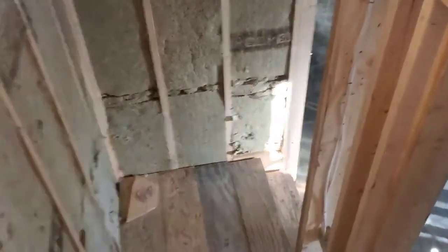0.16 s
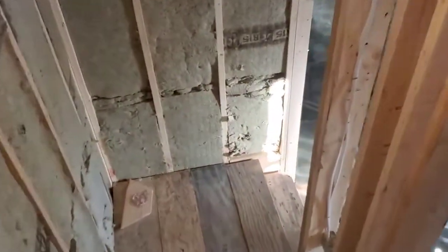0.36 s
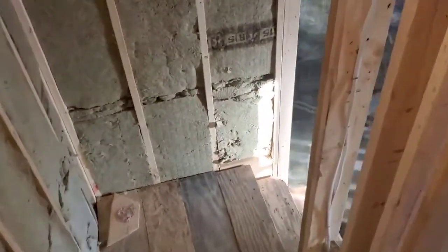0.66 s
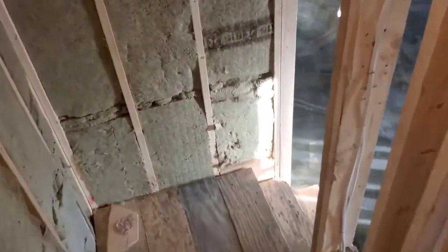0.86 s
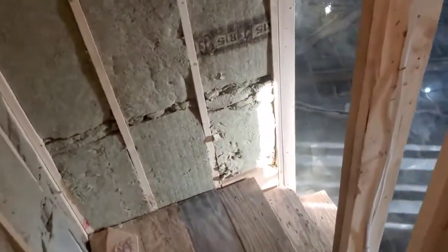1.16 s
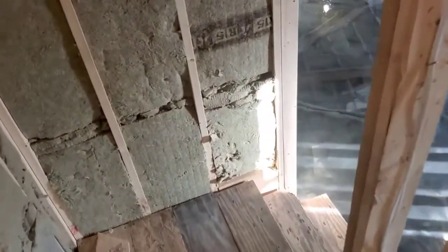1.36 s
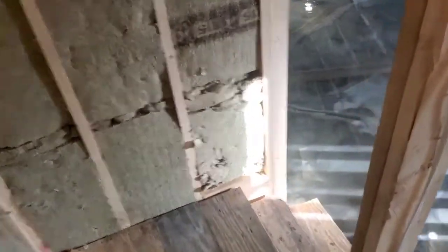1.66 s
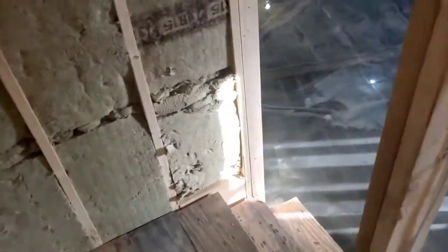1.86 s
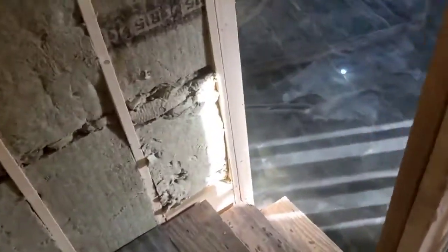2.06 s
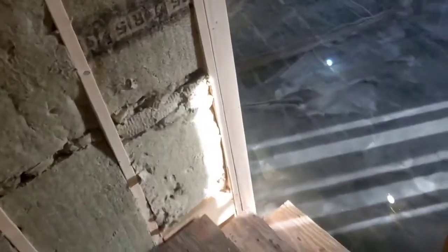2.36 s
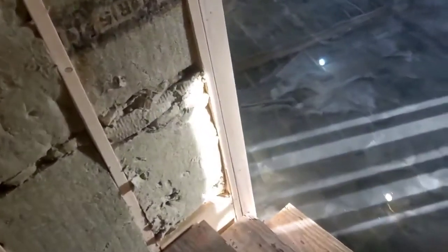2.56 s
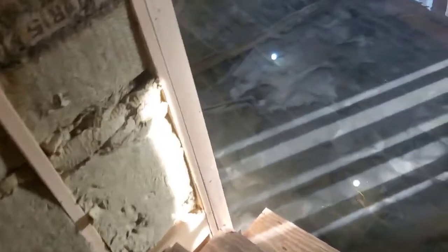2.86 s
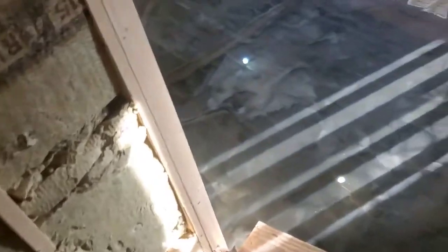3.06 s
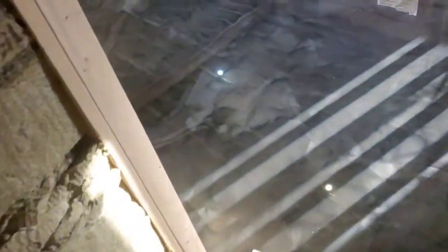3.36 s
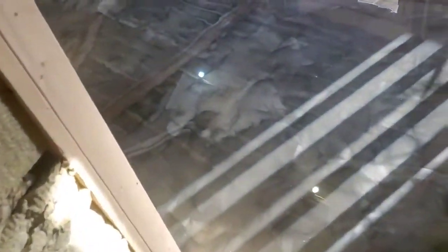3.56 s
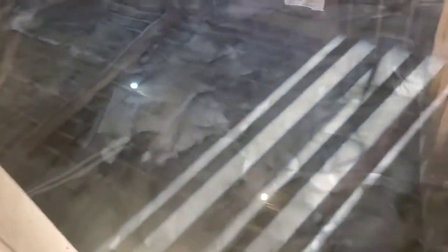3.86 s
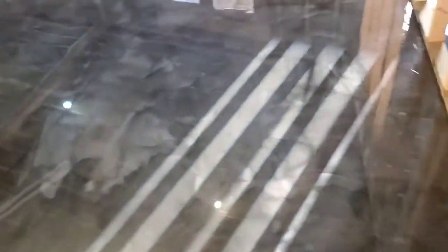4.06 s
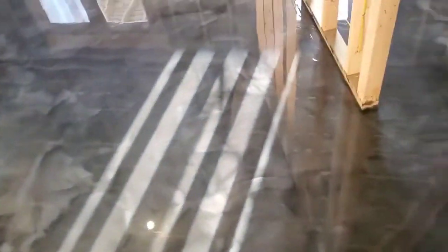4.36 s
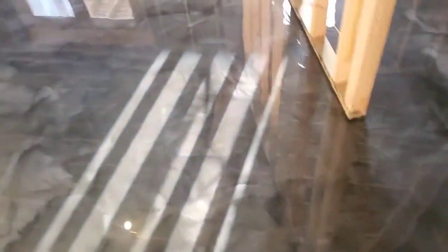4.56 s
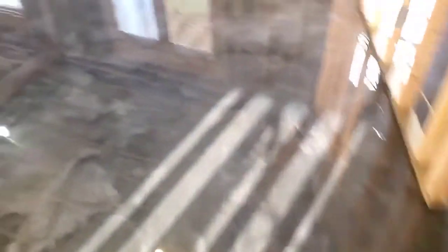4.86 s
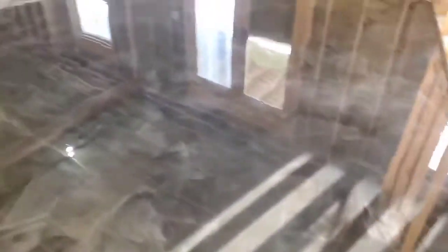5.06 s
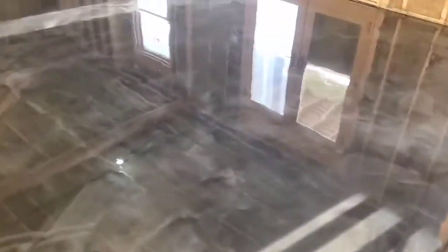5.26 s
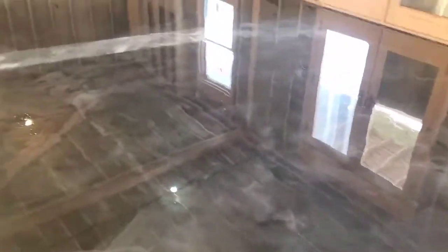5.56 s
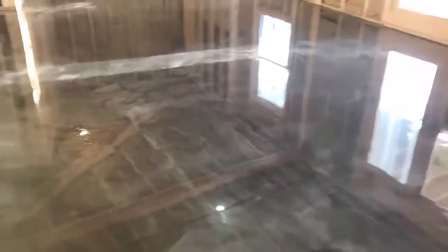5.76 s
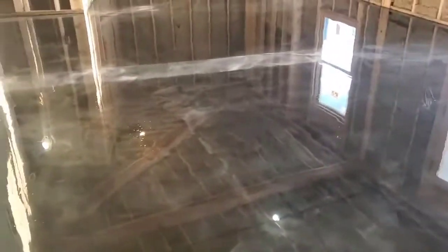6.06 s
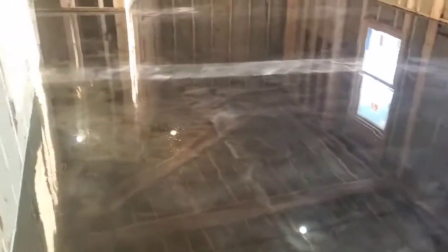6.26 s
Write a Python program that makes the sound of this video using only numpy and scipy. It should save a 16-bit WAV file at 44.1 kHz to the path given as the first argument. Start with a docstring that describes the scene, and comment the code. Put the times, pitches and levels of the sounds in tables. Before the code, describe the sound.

Gritty shoes clack and scuff irregularly down bare wooden stairs, boards thudding softly, then a hollow heel knock in an unfinished, lightly echoing house.

```python
"""Unfinished house, open storey: someone walks down bare wooden stairs and out onto a polished concrete floor.
Gritty soles clack and scuff: noise bursts and streams of grains ring the tread's resonances.
The stair frame thuds and sways under the weight: decaying sines and low noise. One heel knocks on a hollow step.
Clothes swish close by as swells of coloured noise; a faint room hiss and a low rumble lie behind.
The feet sound a little right of centre, and a diffuse room tail answers them."""
import sys
import numpy as np
from scipy import signal
from scipy.fft import rfft, irfft, next_fast_len
from scipy.io import wavfile

SR = 44100
rng = np.random.default_rng(int(sys.argv[2]) if len(sys.argv) > 2 else 0)


def persist_wave(psi):
    """Save psi, clipped to +-1, as 16-bit WAV."""
    counts = np.round(np.clip(psi, -1, 1) * 32767).astype(np.int16)
    wavfile.write(sys.argv[1], SR, np.atleast_2d(counts).T)


N = 282681
TIME = np.arange(N) / SR   # seconds


def from_db(db):
    """Decibels to gain."""
    return 10 ** (np.asarray(db) / 20)


def rms_one(x):
    """Scale to rms 1."""
    return x / np.sqrt(np.mean(x ** 2) + 1e-20)


def at_hz(points, hz):
    """Read a curve whose points are joined on a log-frequency axis."""
    point_hz, value = np.transpose(points)
    return np.interp(np.log(np.maximum(hz, 1)), np.log(point_hz), value)


def add(track, s, sound):
    """Lay a sound into the track at time s."""
    at = int(np.clip(round(s * SR), 0, N - 1))
    track[..., at:at + sound.shape[-1]] += sound[..., :N - at]


def band(x, hz, kind, order=2):
    """Butterworth filter."""
    return signal.sosfilt(signal.butter(order, hz, kind, fs=SR, output="sos"), x)


def low_noise(size, hz):
    """Slow random wandering of rms 1: white noise kept below hz."""
    return rms_one(band(rng.standard_normal(size), hz, "low"))


def coloured(x, spectrum):
    """Causal (minimum-phase) filter with the given spectrum, built by folding its cepstrum."""
    size = 2 * next_fast_len(x.shape[-1] * 2 // 3)
    gain = from_db(at_hz(spectrum, np.fft.rfftfreq(size, 1 / SR)))
    cepstrum = irfft(np.log(gain))
    cepstrum[1:size // 2] *= 2
    cepstrum[size // 2 + 1:] = 0
    return irfft(rfft(x, size) * np.exp(rfft(cepstrum)))[..., :x.shape[-1]]


def resonance(x, hz, width_hz, db):
    """Two-pole resonance with the given gain at its peak."""
    radius = np.exp(-np.pi * width_hz / SR)
    poles = [1, -2 * radius * np.cos(2 * np.pi * hz / SR), radius * radius]
    return from_db(db) * (1 - radius * radius) / 2 * signal.lfilter([1, 0, -1], poles, x)


# How alike the left and right microphones hear a source: hz, likeness (1 same, 0 unrelated, -1 opposed)
LIKENESS = [(60, 0.97), (130, 0.86), (290, 0.84), (640, 0.49), (1400, 0.23), (3100, -0.15), (6800, 0.56),
            (15000, 0.49)]


def stereo_noise(size):
    """White noise, nearly the same on both sides in the bass and more diffuse above."""
    padded = 2 * next_fast_len(size // 2 + 1)
    mid, side = rfft(rng.standard_normal((2, padded)))
    alike = np.clip(at_hz(LIKENESS, np.fft.rfftfreq(padded, 1 / SR)), -.99, .99)
    mid = mid * np.sqrt((1 + alike) / 2)
    side = side * np.sqrt((1 - alike) / 2)
    return irfft(np.array([mid + side, mid - side]))[:, :size]


def panned(x, db):
    """Each side brought to rms 1, then left louder than right by db."""
    return np.array([rms_one(side) for side in x]) * from_db([[db / 2], [-db / 2]])


# Resonances of the wooden tread: pitch_hz, width_hz, gain_db
TREAD_MODES = [(293, 10, -1), (418, 44, 2.5), (478.7, 5.6, 10), (581.5, 66, -0.5), (952, 12, 1),
               (1136, 100, -7), (1291, 18, -4), (1390, 210, -1.5), (1705, 200, -3), (1937, 124, -1),
               (2130, 94, -7.5), (2323, 32, 1), (2594, 20, 5)]
# Colour of the sole on the board: hz, gain_db
SOLE_SPECTRUM = [(100, 6), (250, 4), (450, 2), (650, 6), (900, -0.5), (1350, -0.5), (2100, 0.5), (3000, -8),
                 (4500, -10.5), (7000, -9), (9200, -18.5), (11000, -10), (13000, -9.5), (15500, -19.5)]


def tread(force, vary_db):
    """A sole's force sets the board ringing, each mode with a strength that varies at random by vary_db."""
    gains = from_db(vary_db * rng.standard_normal(len(TREAD_MODES)))
    ringing = sum(gain * resonance(force, *mode) for gain, mode in zip(gains, TREAD_MODES))
    return coloured(force + ringing, SOLE_SPECTRUM)


FEET_PAN_DB = -7   # left over right: negative is louder on the right, before the left side's colour
HOLLOW_DB, HOLLOW_PER_DB = -12, 0.37   # hollow body at a 0 dB contact; growth for each dB lighter
SPARKLE_DB = 6.5   # crushed grit gets an extra lift at the very top
# Shoe contacts, levels and grit relative to the common settings in clacks():
# start_s, level_db, grit_db, pitch_hz (favoured by the spot), scuff_s (crunch decay)
CONTACTS = [(0.001, -32.5, -29, 1490, 0.0026), (0.094, -36, -44, 1200, 0.028),
            (0.364, -43, -14, 1300, 0.019), (0.414, -45.5, -1, 1680, 0.013), (0.446, -28, -18, 1320, .014),
            (0.566, -25.5, -21, 1130, 0.0074), (0.74, -49, -10, 1280, 0.015), (0.84, -41, -33, 1320, .006),
            (0.85, -20.5, -24.5, 1460, 0.0078), (0.859, -27, -13.5, 1750, 0.011),
            (0.882, -30, -18.5, 617, 0.0059), (0.902, -52, -5, 1990, 0.0057),
            (0.945, -35.5, -46, 1820, 0.0093), (1.409, -33.5, -32, 1070, 0.015),
            (1.436, -35, -43, 1260, 0.02), (1.892, -39.5, -19, 1070, 0.011),
            (1.909, -31, -22.5, 1130, 0.015), (1.954, -34, -42, 1420, 0.038),
            (2.016, -35, -27, 1500, 0.0076), (2.200, -42.5, -20, 1030, 0.011),
            (2.46, -25.5, -13.5, 1970, 0.0065), (2.466, -25, -18.5, 1580, 0.0072),
            (2.478, -20.5, -20, 1590, 0.0091), (2.495, -18.5, -19.5, 2130, 0.0054),
            (2.506, -20, -35, 1150, 0.0037), (2.617, -28, -18, 1980, 0.0087), (2.865, -41, -33, 450, 0.01),
            (2.884, -40.5, -20, 2250, 0.017), (2.916, -37, -30, 1410, 0.013),
            (2.951, -39.5, -18, 1620, 0.015), (3.08, -36.5, -13.5, 1520, 0.0037),
            (3.145, -44.5, -20, 1050, 0.0073), (3.321, -44, -15, 2060, 0.051),
            (3.441, -47, -17, 1800, .004), (3.486, -42, -24, 1100, 0.011), (3.509, -41, -10, 1330, 0.0054),
            (3.561, -37, -22, 1430, 0.067), (3.623, -35, -18.5, 1890, 0.0098),
            (3.665, -43.5, -16, 1760, 0.006), (4.128, -46.5, -12, 1920, 0.015),
            (4.973, -46, -9.5, 1670, 0.0054), (5.675, -47, -11, 1320, 0.014),
            (5.71, -38.5, -26, 1730, .012)]


def clacks(level_db=-21, grit_db=16.5, grain_db=3.5, snap_db=0, snap_s=0.00011, walls_db=-11.0,
           walls_s=0.017, brush_db=-10, brush_s=0.0056, vary_db=3, spot_db=3, spot_width_hz=170):
    """The sole brushes the board, lands with a snap and a gritty crunch, and scatters off the studs close by."""
    lead_s = .012   # room for the brush before each landing
    out, t = np.zeros((2, N)), TIME[:SR // 8] - lead_s
    brush = from_db(brush_db) * np.exp(-abs(t) / brush_s)
    snap = from_db(snap_db) * np.exp(-abs(t) / snap_s)
    walls = from_db(walls_db) * np.exp(-abs(t) / walls_s)
    for s, db, grit, spot_hz, scuff_s in CONTACTS:
        grains = rms_one(from_db(grain_db * low_noise(len(t), 346)))
        crunch = grains * np.exp(-abs(t) / scuff_s)
        force = stereo_noise(len(t)) * np.where(t < 0, brush, snap + walls + crunch)
        force = force + resonance(force, spot_hz, spot_width_hz, spot_db)
        hollow, treble = HOLLOW_DB - HOLLOW_PER_DB * db, grit + grit_db
        colour = [(600, hollow), (1200, 0.6), (2400, 0), (3300, 0),
                  (5000, treble), (12000, treble), (14500, treble + SPARKLE_DB)]
        step = panned(coloured(tread(force, vary_db), colour), FEET_PAN_DB)
        add(out, s - lead_s, step * from_db(db + level_db))
    return out


SCUFF_ATTACK_S, SCUFF_RELEASE_S = 0.0093, 0.02
SETTLE_DB, SETTLE_S = -24.5, 0.27   # the foot goes on shifting a little after each slide
JUDDER_DB, JUDDER_HZ = 2, 45   # the sole catches and lets go, at random below this rate
# A sole slides after it lands or before it lifts: start_s, level_db, length_s (full pressure)
SCUFFS = [(0.0, -45.5, 0.0025), (0.399, -59, 0.21), (0.89, -44.5, 0.013), (0.974, -56.5, 0.059),
          (1.487, -53.5, 0.012), (2.001, -57.5, 0.046), (2.452, -40.5, .06), (2.607, -59, .01),
          (2.912, -57.5, 0.08), (3.63, -55, 0.033), (5.694, -54.5, 0.053), (5.759, -55, 0.063)]


def scuffs(grain_db=2.5, pan_db=-6.0):
    """A sliding sole rubs the tread with a stream of grains: attack, hold, release, then the foot settles."""
    pressure = 0
    for s, db, length_s in SCUFFS:
        before, after = np.maximum(s - TIME, 0), np.maximum(TIME - s - length_s, 0)
        release = np.exp(-after / SCUFF_RELEASE_S) + from_db(SETTLE_DB) * np.exp(-after / SETTLE_S)
        pressure = pressure + from_db(db) * np.exp(-before / SCUFF_ATTACK_S) * release
    grains = from_db(grain_db * low_noise(N, 760))
    judder = from_db(JUDDER_DB * low_noise(N, JUDDER_HZ))
    return panned(tread(stereo_noise(N) * grains * judder, 0), pan_db) * pressure


RING_CYCLES, SWELL_CYCLES = 23.3, 0.27   # swings for a board to die by 60 dB, and to get going
# Weight coming onto the boards: start_s, level_db (of the board's swing at its peak), pitch_hz
THUDS = [(0.0, -40, 56.6), (0.094, -44.5, 202), (0.281, -48.5, 220), (0.406, -44.5, 110.6),
         (0.571, -40, 197), (0.613, -44.5, 79.7), (0.856, -35, 620), (0.86, -41, 69.5), (0.913, -34, 105),
         (1.021, -41, 143), (1.032, -40, 54.7), (1.097, -44, 108.6), (1.388, -46, 129), (1.44, -41.5, 246),
         (1.445, -43, 69.4), (1.505, -41.5, 60.2), (1.511, -46.5, 133), (1.866, -46.5, 295),
         (1.884, -49.5, 78.6), (2.021, -44, 49.5), (2.075, -39, 377), (2.09, -35.5, 107.7),
         (2.116, -42.5, 390), (2.127, -38.5, 120.3), (2.466, -31.5, 610), (2.477, -40, 135),
         (2.505, -35, 396), (2.554, -35, 110), (2.558, -40.5, 45.7), (2.859, -46, 77), (3.078, -50, 59.5),
         (3.345, -53, 312), (3.482, -52, 510), (3.506, -29.5, 43), (3.626, -39, 362), (3.656, -28.5, 92.8),
         (4.081, -44.5, 60.5), (4.147, -35.5, 90), (4.266, -61.5, 390), (4.355, -53.5, 387),
         (4.947, -42.5, 188), (5.084, -52, 855), (5.181, -31, 44.3), (5.185, -52, 74.5), (5.708, -33, 157),
         (5.708, -36.5, 291), (5.723, -39.5, 94.7), (5.741, -40.5, 56)]


def thuds(frame_db=-15, frame_ring=1.71, overtone=2.15, overtone_db=-23):
    """A loaded board swings at its own pitch and shakes the frame; low boards build slower and last longer."""
    out, t = np.zeros((2, N)), TIME[:SR // 2]
    for s, db, hz in THUDS:
        swell_s, t60 = SWELL_CYCLES / hz, RING_CYCLES / hz
        swell = 1 - np.exp(-(t / swell_s) ** 2)
        swing = swell * from_db(-60 * t / t60)
        shake = swell * from_db(-60 * t / (t60 * frame_ring))
        board = np.sin(2 * np.pi * hz * t) + from_db(overtone_db) * np.sin(2 * np.pi * overtone * hz * t)
        frame = rms_one(band(stereo_noise(len(t)), [hz * 0.63, hz * 1.73], "band"))
        add(out, s, from_db(db) * (swing * board + from_db(frame_db) * shake * frame) / swing.max())
    return out


SWAY_AT_DB, SWAY_DB = -40, -58.5   # a thud of the first level leaves a sway of the second
SWAY_FOLLOWS, SWAY_S = 0.4, 0.26   # sway dB for each dB of thud; decay


def sway():
    """Every load leaves the whole flight rocking for a while: low noise that decays after each thud."""
    power = 0
    for s, db, _ in THUDS:
        rock = from_db(SWAY_DB + SWAY_FOLLOWS * (db - SWAY_AT_DB)) * np.exp(-abs(TIME - s) / SWAY_S)
        power = power + (rock * (TIME > s)) ** 2
    return rms_one(band(stereo_noise(N), [30, 62], "band")) * np.sqrt(power)


HEEL_S, HEEL_HZ, HEEL_HALF_S = 5.0324, 255, .0023   # centre of the blow, its pitch, its spread
HEEL_DB = -22   # the whole knock
# The hollow bottom step under a heel: pitch_hz, level_db (within the ring), t60_s
STEP_MODES = [(115.6, -4, 0.34), (149, 2, 0.21), (197, 6.5, 0.078), (267, 8.5, 0.073), (308, -6.5, 0.27),
              (423, 1.5, 0.081), (544, -7.5, 0.16), (662, -14, 0.22), (870, -38, 0.28), (1290, -30, 0.3),
              (2080, -29, 0.17)]


def heel(ring_db=-10.5, echo_db=-10, echo_s=0.02, scatter_db=-16, scatter_s=0.03,
         slap_db=-34, slap_s=0.053):
    """A soft heel gives one push and pull with a faint slap; the step rings on, and the walls answer."""
    out, t = np.zeros((2, N)), TIME[:SR // 2]
    from_centre = TIME - HEEL_S
    blow = np.sin(2 * np.pi * HEEL_HZ * from_centre) * np.exp(-(from_centre / HEEL_HALF_S) ** 2 / 2)
    ring = sum(from_db(db) * np.sin(2 * np.pi * hz * t) * from_db(-60 * t / t60)
               for hz, db, t60 in STEP_MODES)
    scatter = rms_one(band(stereo_noise(len(t)), [140, 750], "band", order=4)) * np.exp(-t / scatter_s)
    slap = rms_one(band(stereo_noise(len(t)), [500, 1900], "band")) * np.exp(-t / slap_s)
    contact = 1 - np.exp(-t / HEEL_HALF_S)   # the rubber takes a moment to compress
    body = contact * (from_db(ring_db) * ring + from_db(scatter_db) * scatter)
    add(out, HEEL_S - 2 * HEEL_HALF_S, body + from_db(slap_db) * slap)
    add(out, echo_s, from_db(echo_db) * blow)   # the blow again, echo_s later
    return from_db(HEEL_DB) * (out + blow)


def bell(s, half_s):
    """A smooth swell of height 1 around time s."""
    return np.exp(-((TIME - s) / half_s) ** 2 / 2)


TRAIL_DB, TRAIL_LAG_S, TRAIL_HALF_S = -13, .17, 0.089   # the loose cloth swings after the leg
# Colour of the fabric: hz, gain_db
CLOTH_SPECTRUM = [(200, -25), (600, -2), (900, -6), (1400, -6), (1900, 2.5), (3000, -6.5), (5000, -9.5),
                  (7200, -4.5), (9200, -15), (11500, -3.5), (13500, -6.5), (16000, -18)]
# One swish of clothing for each stride: centre_s, level_db, half_length_s
SWISHES = [(0.035, -66.5, 0.19), (0.424, -62, 0.048), (1.02, -55.5, 0.053), (1.546, -65, 0.11),
           (2.011, -53.5, 0.031), (2.497, -75, 0.033), (3.077, -60.5, 0.069), (4.145, -71, 0.055),
           (4.434, -65.5, 0.1), (5.22, -62, 0.086), (5.76, -65.5, 0.056)]


def clothes(flutter_db=1.07, pan_db=-1):
    """Fabric brushes on fabric with every stride, swelling and fading, and a softer swish trails behind."""
    power = 0
    for s, db, half_s in SWISHES:
        swish = from_db(db) * bell(s, half_s)
        trail = from_db(db + TRAIL_DB) * bell(s + TRAIL_LAG_S, TRAIL_HALF_S)
        power = power + swish ** 2 + trail ** 2
    flutter = from_db(flutter_db * low_noise(N, 60))
    return panned(coloured(stereo_noise(N), CLOTH_SPECTRUM), pan_db) * np.sqrt(power) * flutter


# Decay of the open storey: hz, t60_s
ROOM_T60 = [(100, 0.41), (500, 0.44), (2000, 0.19), (6000, 0.2), (15000, 0.28)]


def room(x, build_s=0.013):
    """The open storey: a diffuse tail of noise in octave bands that dies sooner in the treble than the bass."""
    t, edges = TIME[:SR], 60 * 2. ** np.arange(9)
    noise = stereo_noise(SR)
    tail = 0
    for lo, hi in zip(edges, edges[1:]):
        t60 = at_hz(ROOM_T60, np.sqrt(lo * hi))
        tail = tail + band(noise, [lo, hi], "band") * 1000 ** (-t / t60)
    tail = rms_one(tail * (1 - np.exp(-t / build_s))) / np.sqrt(SR)   # unit energy
    return signal.fftconvolve(x, tail, axes=1)[:, :N]


HISS_FALL_DB_PER_S = 0.83   # the hiss sinks as the stairwell opens into the room
# Colour of the air in the house: hz, gain_db
AIR_SPECTRUM = [(20, 30.5), (40, 19), (62, 11), (100, 6), (160, 1), (350, -0.5), (630, -3.5), (850, -8),
                (1400, -5.5), (2100, -7), (3200, -16), (5000, -19.5), (7000, -15), (9300, -22),
                (12500, -13.5), (16000, -45)]
# A narrow band in the hiss: pitch_hz, width_hz, gain_db
HISS_RING = (1830, 480, -1)


def air(hiss_db=-53.5, rumble_db=-73):
    """A slowly sinking hiss of coloured noise and the steady low rumble of the house."""
    hiss = coloured(stereo_noise(N), AIR_SPECTRUM) * from_db(-HISS_FALL_DB_PER_S * TIME)
    hiss = rms_one(hiss + resonance(hiss, *HISS_RING))
    rumble = rms_one(band(stereo_noise(N), [22, 52], "band", order=4))
    return from_db(hiss_db) * hiss + from_db(rumble_db) * rumble


# Colour of the soles on the left side: hz, gain_db
LEFT_COLOUR = [(250, 5.5), (700, 5), (1300, 2), (2100, 1), (3500, 6.5), (6000, 1.5), (9000, 4),
               (13000, -1.5)]


def scene(room_db=-17, low_room_db=-20):
    """Steps in the room, clothes close by, the air behind."""
    left, right = clacks() + scuffs()
    soles = np.array([coloured(left, LEFT_COLOUR), right])
    boards = thuds() + sway() + heel()
    tail = room(from_db(room_db) * soles + from_db(low_room_db) * boards)
    return soles + boards + tail + clothes() + air()


CUTOFF_HZ = 15900


def record(dry):
    """The top of the sound is cut steeply by an elliptic low-pass."""
    return signal.sosfilt(signal.ellip(10, .2, 70, CUTOFF_HZ, fs=SR, output="sos"), dry)


dry = scene()
out = record(dry)
persist_wave(out)
```